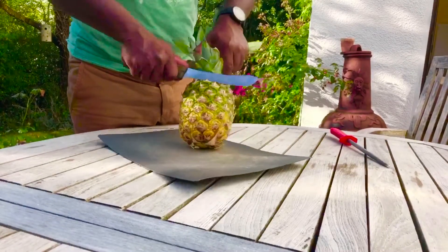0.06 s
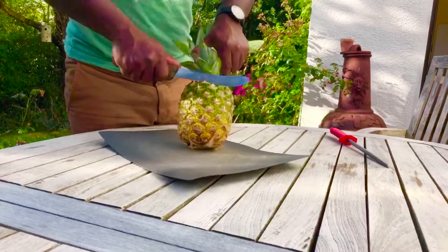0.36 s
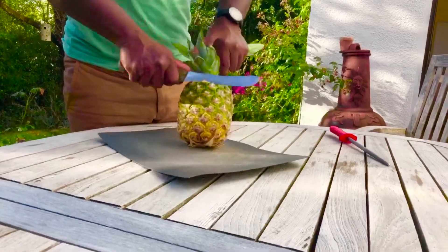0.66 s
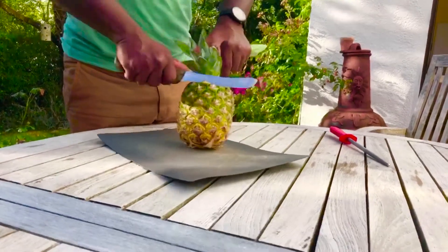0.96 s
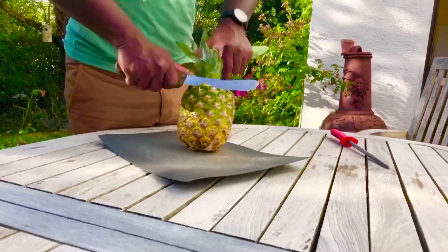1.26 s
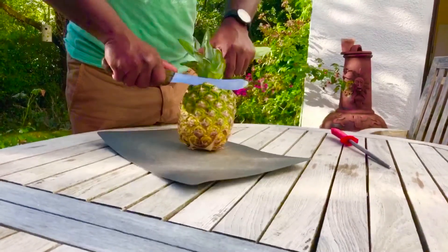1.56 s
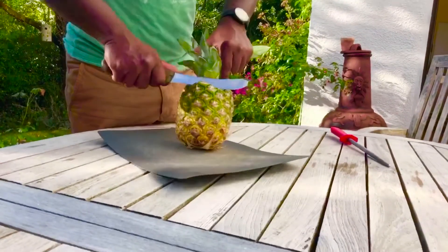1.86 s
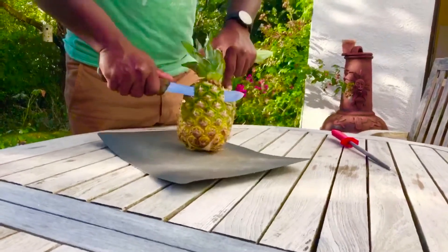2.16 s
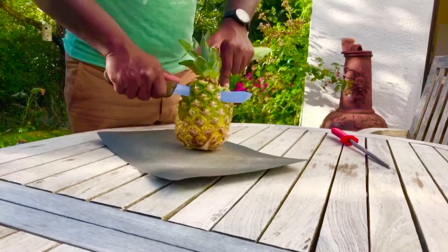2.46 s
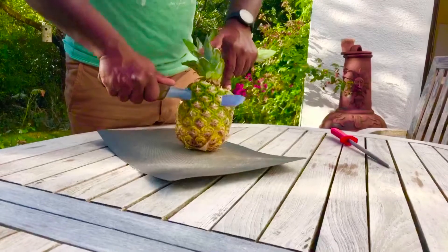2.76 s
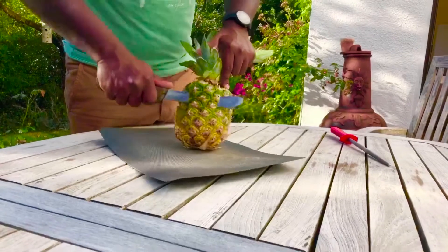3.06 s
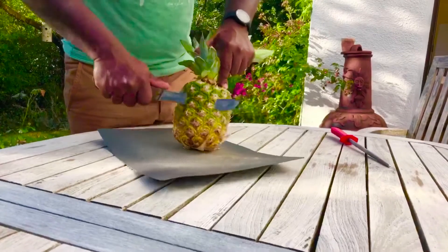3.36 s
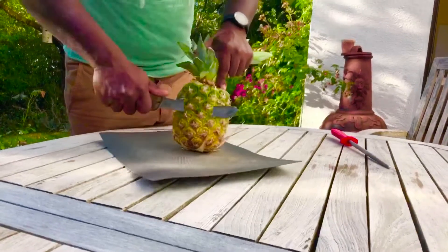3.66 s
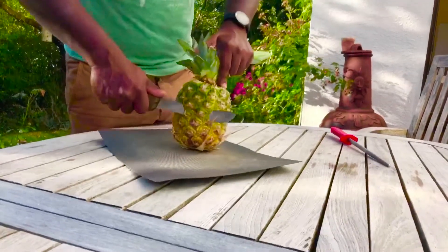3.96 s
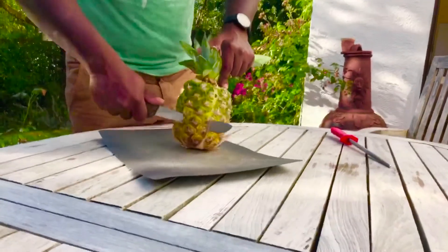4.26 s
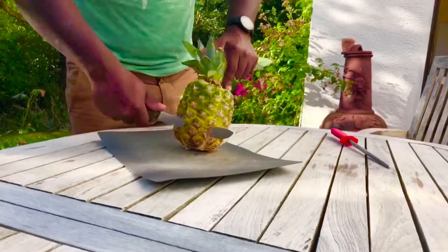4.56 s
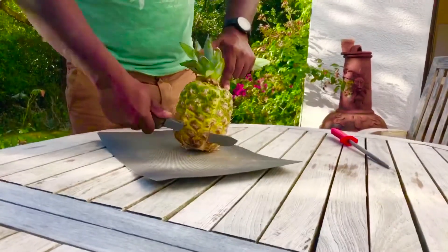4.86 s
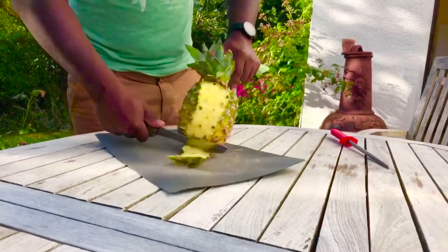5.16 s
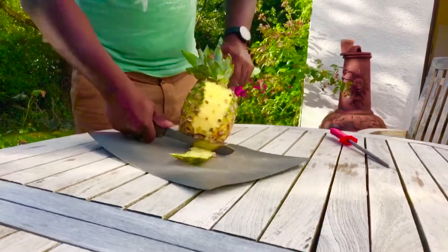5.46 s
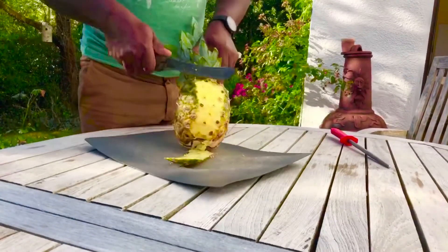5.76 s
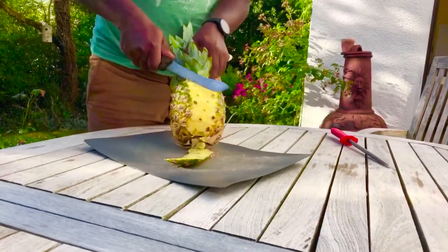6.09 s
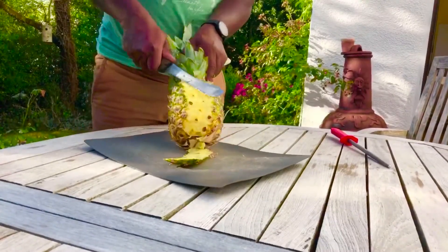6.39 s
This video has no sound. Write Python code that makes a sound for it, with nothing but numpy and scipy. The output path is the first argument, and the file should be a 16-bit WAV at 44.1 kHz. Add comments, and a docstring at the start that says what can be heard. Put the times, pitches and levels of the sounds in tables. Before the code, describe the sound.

In a hushed outdoor spot, pineapple fibres tear and crackle under a sawing knife near the microphone, with dull bumps and scuffs as the fruit rocks on its mat. A faint car engine rises in pitch, and its tyre noise swells and fades. Near the end, blade and rind hit the wooden table with two loud, clattering knocks, and after a short lull come some small, juicy slices.

```python
"""A knife saws a strip of rind off a pineapple standing on a thin mat on a slatted garden table.
Each stroke fractures fibres, a shower of tiny impulses that excites juice pockets and the fruit's body.
Friction and impacts drive the table's bending modes: the strokes rock it, the blade breaks through and
knocks on the slats, then the rind is knocked over. Behind a quiet outdoor hush a car speeds up and
rolls past, with a periodic engine note and broadband tyre noise."""
import sys
import numpy as np
from scipy import signal
from scipy.fft import rfft, irfft, next_fast_len
from scipy.io import wavfile
from scipy.ndimage import uniform_filter1d

SR = 44100
rng = np.random.default_rng(int(sys.argv[2]) if len(sys.argv) > 2 else 0)


def inscribe(sig):
    """Save sig as 16-bit PCM at rate SR to the path in sys.argv[1].

    A 1-D sig is mono; a 2-D sig holds one channel per row.
    Samples are clipped to [-1, 1] before scaling.
    """
    pcm = np.round(np.clip(np.atleast_2d(sig).T, -1, 1) * 32767)
    wavfile.write(sys.argv[1], SR, pcm.astype(np.int16))


N = 287973

# spectrum of tyre tread on the road: f/Hz, relative level/dB
TREAD_SPECTRUM = [(300, -43.5), (650, -6), (820, 1.5), (1050, -2), (1300, -12), (1700, -12.5), (4000, -51)]
# spectrum of snapping fibres: f/Hz, relative level/dB
FIBRE_SPECTRUM = [(300, -59), (1200, -16.5), (2500, -7), (4000, -0.5), (5300, -3.5), (7500, -5),
                  (10000, -11), (15500, -14.5)]


def undb(db):
    """Amplitude ratio of a level in decibels."""
    return 10 ** (np.asarray(db) / 20)


def unit(x):
    """Normalisation to an rms of 1."""
    return x / np.sqrt(np.mean(x ** 2) + 1e-30)


def curves(rows):
    """Linear interpolation of each column at every sample; the first column is t/s."""
    times, *columns = np.transpose(rows)
    return [np.interp(np.arange(N) / SR, times, column) for column in columns]


def add(track, start_s, sound):
    """Superposition of a sound on a track."""
    start = int(round(start_s * SR))
    sound, start = sound[max(-start, 0):], max(start, 0)
    track[start:start + len(sound)] += sound[:N - start]


def colour(x, spectrum):
    """Minimum-phase filter of unit power gain, shaped by (f/Hz, level/dB) points."""
    size = 4096
    hz, db = np.transpose(spectrum)
    bin_hz = np.arange(size // 2 + 1) * SR / size
    log_gain = np.log(undb(np.interp(np.log(bin_hz + 1), np.log(hz), db)))
    cepstrum = irfft(log_gain)[:size // 2]
    response = irfft(np.exp(rfft(2 * cepstrum, size)))
    return signal.fftconvolve(x, response / np.linalg.norm(response))[:len(x)]


def band(x, low_hz, high_hz, order=3):
    """Zero-phase band-pass filter."""
    size = next_fast_len(len(x) + SR // 10)
    hz = np.arange(size // 2 + 1) * SR / size + 1e-3
    gain = ((1 + (low_hz / hz) ** (2 * order)) * (1 + (hz / high_hz) ** (2 * order))) ** -.5
    return irfft(rfft(x, size) * gain, size)[:len(x)]


def drift(per_s):
    """Slow random modulation of rms 1: random steps, smoothed twice."""
    hold = int(SR / per_s)
    steps = np.repeat(rng.standard_normal(N // hold + 1), hold)
    return unit(uniform_filter1d(uniform_filter1d(steps, hold), hold)[:N])


def snaps(length, per_s, spread_db):
    """Shot noise: independent impulses of uneven size and random sign."""
    size = undb(spread_db * np.minimum(rng.exponential(size=length), 4))
    return unit((rng.random(length) < per_s / SR) * size * rng.choice([-1, 1], length))


def wavering_noise(spectrum, flicker_db):
    """Coloured noise with independent amplitude modulation in each octave."""
    size = next_fast_len(N)
    white = rfft(rng.standard_normal(N), size)
    octave = np.log2(np.arange(size // 2 + 1) * SR / size / 20 + 1e-9)  # counted from 20 Hz
    bands = (irfft(white * np.maximum(1 - abs(octave - k), 0), size)[:N] for k in range(11))
    return unit(colour(sum(part * undb(flicker_db * drift(9.8)) for part in bands), spectrum))


def lull(depth_db, centre_s=5.526, width_s=0.11):
    """Gain for a brief dip in level after the knocks: the wet crackle and the background duck."""
    return undb(depth_db * np.exp(-((np.arange(N) / SR - centre_s) / width_s) ** 2))


def garden(hush_db=-62.5, traffic_db=-80.5, approach_db_per_s=1.5):
    """Ambient noise: a low outdoor hush, and far tyres that grow louder as they draw nearer."""
    # spectrum of the hush: f/Hz, relative level/dB
    hush_spectrum = [(22, -9.5), (40, -4.5), (60, 4.5), (110, 1), (200, -8.5), (400, -9.5), (1000, -17.5),
                     (2000, -24.5), (4000, -32), (7500, -29), (11000, -34), (15500, -36.5)]
    approach = undb(traffic_db + approach_db_per_s * np.arange(N) / SR)
    traffic = approach * wavering_noise(TREAD_SPECTRUM, flicker_db=2.0)
    return undb(hush_db) * wavering_noise(hush_spectrum, flicker_db=1.1) + traffic


def scattered_tone(hz, db, octave_db, scatter=.38):
    """Multipath interference: reflections off houses make a tone and its octave beat and waver."""
    phasor = np.exp(2j * np.pi * np.cumsum(hz) / SR)
    first, second = (phasor ** k * (1 + scatter * (drift(38) + 1j * drift(38))) for k in (1, 2))
    return unit((first + undb(octave_db) * second).real) * undb(db)


def engine(start_hz=108.5, climb_hz_per_s=35, top_hz=162.8, lift_s=1.92, coast_s=.28):
    """Periodic firing sets the pitch of a low hum, which climbs, then sinks off the throttle."""
    # the low hum, an engine note with brief swells where the table thumps: t/s, level/dB
    hum_levels = [(0.0, -67), (0.29, -49.5), (0.41, -55), (1.16, -52), (1.19, -39), (1.27, -61.5),
                  (1.56, -43.5), (1.61, -63), (1.73, -39), (2.0, -42), (2.03, -51), (2.6, -68), (2.85, -64),
                  (3.9, -64), (6.5, -68.5)]
    # fainter drone of the passing car: t/s, f/Hz, level/dB
    drone_path = [(0, 135, -67), (1.5, 158, -64.5), (2.3, 158.4, -63.5), (2.8, 156.2, -59.5),
                  (3.8, 145.9, -70.5), (6.5, 146, -96)]
    t = np.arange(N) / SR
    slowing = (1 + np.maximum(t - lift_s, 0) / coast_s) ** .36
    firing_hz = np.minimum(start_hz + climb_hz_per_s * t, top_hz) / slowing
    hum = scattered_tone(firing_hz, *curves(hum_levels), octave_db=-27)
    return hum + scattered_tone(*curves(drone_path), octave_db=-5)


def tyres():
    """Spreading loss: rolling noise swells and fades as an inverse power of the car's distance."""
    # passage of roar, tread song and hiss: t/s when loudest, level/dB, width/s, distance exponent
    passage = [(2.51, -58.5, 1.0, 1.08), (2.864, -55, .21, 1.24), (2.27, -65, 1, 1.54)]
    # spectra of road roar and tyre hiss: f/Hz, relative level/dB
    roar_spectrum = [(40, -48.5), (100, 11.5), (300, 3), (550, 3), (750, -3), (1300, -0.5), (2000, -9),
                     (4000, -25), (10000, -70)]
    hiss_spectrum = [(300, 10), (1000, -12), (1800, 2.5), (3600, -1), (6000, -10.5), (10000, -37),
                     (15000, -42)]
    spectra = roar_spectrum, TREAD_SPECTRUM, hiss_spectrum
    out, t = 0, np.arange(N) / SR
    for spectrum, (nearest_s, db, width_s, exponent) in zip(spectra, passage):
        distance = np.hypot(1, (t - nearest_s) / width_s)  # 1 at the nearest point
        out += undb(db) / distance ** exponent * wavering_noise(spectrum, flicker_db=1.5)
    return out


def table_response(lag_s=0.00097, jolt_db=-7, dense_db=-1, dense_t60=0.11, wall_db=-20, wall_t60=0.37):
    """Impulse response of the table: a jolt, damped modes, dense ringing, a faint tail off a wall."""
    # modes of the slatted table: f/Hz, relative level/dB, T60/s
    slat_modes = [(62, 6, 0.25), (97, 3.5, 0.065), (168.8, 14.5, 0.098), (203.5, 2.5, 0.084),
                  (283.6, -4, 0.72), (339.5, 0.5, 0.45), (361.6, 3.5, 0.18), (410, 5.5, 0.25),
                  (531, -4, 0.14), (644, -7, 0.11), (911, -30, .18), (1103, -6, .1), (1247, -4, 0.14),
                  (1482, -13, 0.068), (1626, -19, 0.037), (1817, -3.5, 0.021), (2260, -13, 0.06),
                  (2485, -4, 0.03), (2738, -6, .1), (3190, 1, .028), (3850, -3, .06)]
    # spectrum of its dense, weaker ringing: f/Hz, relative level/dB
    dense_spectrum = [(51, -17), (151, 5), (252, 7.5), (385, 2.5), (620, -4), (1550, -11), (3050, -15),
                      (5100, -21), (9100, -30), (15100, -39)]
    t = np.arange(SR // 2) / SR

    def decay(hz, t60):
        """Time since arrival, and envelope. Dispersion makes low bending waves arrive late."""
        age = np.maximum(t - lag_s * np.sqrt(300 / hz), 0)
        return age, (age > 0) * np.exp(-np.log(1000) * age / t60)

    modes, dense = 0, 0
    for k, (hz, db, t60) in enumerate(slat_modes):
        age, fade = decay(hz, t60)
        modes += (-1) ** k * undb(db) * unit(fade * np.sin(2 * np.pi * hz * age))
    for hz in 45 * 2. ** np.arange(9):
        _, fade = decay(hz, dense_t60 * min(500 / hz, 1) ** .33)
        _, tail = decay(hz, wall_t60 * (500 / hz) ** 0.052)
        octave_noise = band(rng.standard_normal(len(t)), hz, 2 * hz)
        dense += np.sqrt(hz) * unit(octave_noise * (fade + undb(wall_db) * tail))
    jolt = np.exp(-t / 0.0002) * np.cos(2 * np.pi * 90 * t)
    return undb(jolt_db) * unit(jolt) + unit(modes) + undb(dense_db) * unit(colour(dense, dense_spectrum))


def table(chatter_share=0.77, first_hit_s=0.027, clean_hit_s=0.0015):
    """Forced vibration: every knock and shove is a contact force driving the same slats."""
    # blade and rind striking the table:
    # t/s, crack level/dB, crack cutoff f/Hz, thud level/dB, thud f/Hz, clatter level/dB
    knocks = [(4.8417, -30, 2530, -33.5, 152, -32.5), (4.964, -46.5, 1580, -36, 118, -53),
              (5.097, -31, 2780, -33, 375, -39), (5.152, -56, 1800, -40.5, 367, -54),
              (5.269, -61, 1580, -56, 320, -75)]
    # strokes shoving the fruit on its mat:
    # t/s, scuff level/dB, scuff cutoff f/Hz, thump level/dB, chatter decay/s
    shoves = [(.256, -54.5, 950, -54, 0.0045), (.284, -47.5, 1360, -45, 0.066),
              (0.551, -52, 987, -44.5, 0.028), (.849, -50.5, 517, -42.5, 0.053),
              (1.11, -46.5, 764, -47, 0.059), (1.494, -45.5, 1280, -47, 0.028),
              (1.70, -48.5, 600, -40.5, 0.059), (2.129, -55, 477, -50, 0.056),
              (3.236, -49, 497, -45, 0.047), (3.565, -51.5, 705, -45, 0.086),
              (3.878, -43.5, 465, -46.5, 0.034), (4.16, -53.5, 700, -51, 0.029),
              (4.36, -93, 400, -56.5, 0.0067), (4.515, -57, 503, -50.5, .012),
              (5.754, -78, 400, -61, 0.0084), (6.258, -58, 1020, -57.5, 0.085)]
    out, response = np.zeros(N), table_response()
    t, lead = np.arange(len(response)) / SR, SR // 20

    def contact(start_s, db, low_hz, high_hz, chatter_s, order=3):
        """Convolution of a push and its chatter with the response; soft contacts lose their treble."""
        force = snaps(len(t), per_s=2500, spread_db=-3.0) * np.exp(-t / max(chatter_s, 1e-3))
        force *= chatter_share / (np.linalg.norm(force) + 1e-12)
        force *= 1 - np.exp(-chatter_s / clean_hit_s)  # short blows hardly chatter
        force[0] += np.exp(-chatter_s / first_hit_s)  # slow shoves have little first impact
        ringing = signal.fftconvolve(force, response)[:len(t)]
        blow = band(np.pad(ringing, (lead, 0)), low_hz, high_hz, order)
        blow *= np.sqrt(SR / 50) / np.linalg.norm(blow)  # the energy of 20 ms at rms 1
        add(out, start_s - lead / SR, undb(db) * blow)

    for s, crack_db, crack_hz, thud_db, thud_hz, clatter_db in knocks:
        # the edge cracks; the weight follows and sounds a narrow band of modes
        contact(s, crack_db, 0.36 * crack_hz, crack_hz, chatter_s=0.003)
        contact(s + 0.00626, thud_db, thud_hz, thud_hz, chatter_s=0.0032, order=4)
        # the slats jump, then settle
        contact(s + .011, clatter_db, low_hz=416, high_hz=1300, chatter_s=0.013)
        contact(s + .05, clatter_db - 8, low_hz=thud_hz, high_hz=890, chatter_s=0.064)
        # the whole table rocks
        contact(s + 0.0114, thud_db - 14.5, low_hz=54.7, high_hz=115, chatter_s=0.11)
    for s, scuff_db, scuff_hz, thump_db, chatter_s in shoves:
        # the mat rubs on the slats, then the fruit rocks back
        contact(s, scuff_db, low_hz=360, high_hz=scuff_hz, chatter_s=chatter_s)
        contact(s + 0.0207, thump_db, low_hz=50, high_hz=194, chatter_s=chatter_s)
    return out


def juice_pockets(x, share, decay_s=0.0012, count=3):
    """Resonance: small juice pockets ring at their own pitches; the blade meets new ones every 10 ms."""
    size = SR // 100
    patches = np.pad(x, (0, -len(x) % size)).reshape(-1, size)
    t = np.arange(size + 1) / SR
    hz = 2000 * 7 ** rng.random((len(patches), count, 1))  # 2 to 14 kHz
    response = (np.sin(2 * np.pi * hz * t) * np.exp(-t / decay_s)).sum(1)
    response *= share / np.linalg.norm(response, axis=1, keepdims=True)
    response[:, 0] = 1  # the direct sound
    ringing = signal.fftconvolve(patches, response, axes=1) / np.hypot(1, share)
    ringing[1:, :size] += ringing[:-1, size:]  # each ring runs on into the next patch
    return ringing[:, :size].ravel()[:len(x)]


def wet_flesh(slide_db=-76, patchy_db=5.0):
    """Modulated shot noise: juice crackles softly in patches as the blade slides."""
    crackle = juice_pockets(snaps(N, per_s=1100, spread_db=2.0), share=0.52)
    level_db = slide_db + patchy_db * drift(22)
    return unit(colour(crackle, FIBRE_SPECTRUM)) * undb(level_db) * lull(depth_db=-9)


def knife(tough_share=0.72, hiss_share=0.31, swell_s=0.01, bite_db=-21):
    """Fracture noise: tough and fine fibres snap over a wet hiss; deep cuts excite the fruit's body."""
    # tears: t/s of the peak, level/dB, length/s, body re fibres/dB (0 deep cut, -15 light scratch)
    tears = [(0.021, -64, 0.047, -6), (0.191, -64, .05, -11), (0.321, -61.5, .05, -2),
             (0.468, -62, 0.0084, -12), (0.506, -66, 0.047, -18), (0.629, -58.5, 0.034, -1),
             (0.804, -60.5, 0.05, -1.5), (0.935, -61, 0.015, -1), (1.106, -45.5, 0.014, 0.5),
             (1.41, -65.5, 0.072, -16), (1.552, -60, .006, -3), (1.688, -54.5, 0.031, -10),
             (1.713, -46, 0.038, 0.5), (2.2, -69, 0.018, -20), (2.339, -60.5, 0.057, -0.5),
             (2.496, -65.5, .035, -22), (2.626, -53.5, 0.032, 3.5), (2.959, -57.5, 0.025, 7),
             (3.222, -47.5, 0.025, 7), (3.242, -51, 0.015, 0), (3.564, -45, 0.018, 7),
             (3.846, -43, 0.012, 6.5), (3.874, -45.5, 0.039, 4.5), (4.143, -51, 0.029, 1),
             (4.176, -54, 0.035, -1.5), (4.485, -54.5, 0.022, -2), (4.527, -49.5, 0.031, 0.5),
             (4.746, -57, 0.016, 2), (4.8, -45.5, 0.025, 1), (4.84, -37, 0.017, 0), (4.869, -50, 0.096, 4),
             (4.96, -55, 0.074, 0.5), (5.094, -40.5, 0.017, -3), (5.138, -49, 0.053, 11),
             (5.386, -67, 0.034, -3), (5.699, -61.5, 0.016, -7), (6.057, -56, .008, -18),
             (6.101, -51.5, 0.0036, -29), (6.259, -53, 0.014, 5), (6.299, -62.5, 0.049, -3),
             (6.341, -56.5, 0.0093, -2)]
    # response of the fruit's body: f/Hz, relative level/dB
    body_spectrum = [(150, 19.5), (400, 12), (800, 11.5), (1600, 10.5), (2600, 5), (4000, -7), (8000, -25),
                     (15000, -46)]
    fibres, body = np.zeros(N), np.zeros(N)
    t = np.arange(-SR // 5, SR // 4) / SR

    def swell(rise_s, fall_s):
        """Exponential growth and decay about a peak at t = 0."""
        return np.exp(np.where(t < 0, t / rise_s, -t / fall_s))

    bite = undb(bite_db) * swell(rise_s=.017, fall_s=.026)  # a few fibres give before and after the rest
    for peak_s, db, length_s, body_db in tears:
        rise_s = .5 * length_s ** 2 / (length_s + swell_s)  # short tears snap, longer ones swell
        force = np.maximum(swell(rise_s, length_s - rise_s), bite)
        tough = tough_share * snaps(len(t), per_s=400, spread_db=2.5)
        body_share = undb(body_db)
        for track, gain in ((fibres, 1), (body, body_share)):
            fine = snaps(len(t), per_s=4000, spread_db=1.5)
            hiss = hiss_share * rng.standard_normal(len(t))
            shower = force * (tough + fine + hiss)
            shower *= np.linalg.norm(force) / np.linalg.norm(shower)
            add(track, peak_s + t[0], shower * gain * undb(db) / np.hypot(1, body_share))
    snapping = colour(juice_pockets(fibres, share=0.49), FIBRE_SPECTRUM)
    return snapping + colour(juice_pockets(body, share=1.0), body_spectrum)


def scene():
    """Superposition in one channel: knife and table close by, car and garden behind."""
    foreground = knife() + wet_flesh() + table()
    background = (engine() + tyres() + garden()) * lull(depth_db=-3)
    return (foreground + background)[None]


def record(dry, bass_hz=32, top_hz=15750):
    """Band limiting: the microphone cuts the deepest bass and the highest treble."""
    dry = signal.sosfilt(signal.butter(2, bass_hz, "high", fs=SR, output="sos"), dry)
    return signal.sosfilt(signal.ellip(10, .2, 70, top_hz, fs=SR, output="sos"), dry)


dry = scene()
out = record(dry)
inscribe(out)
```